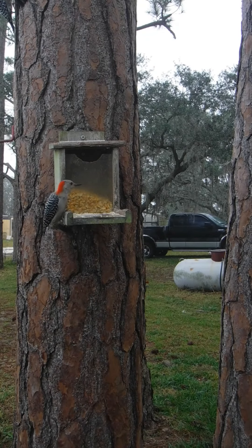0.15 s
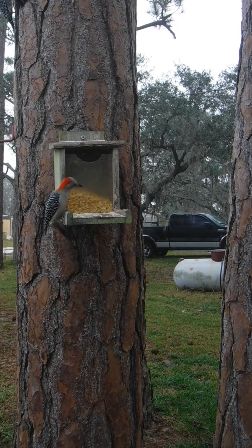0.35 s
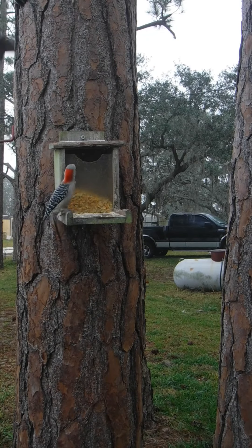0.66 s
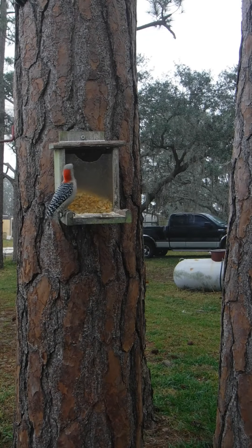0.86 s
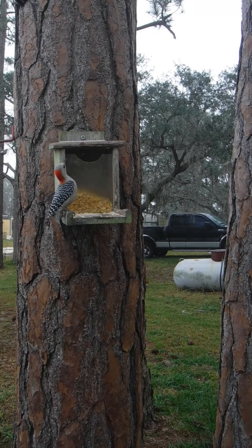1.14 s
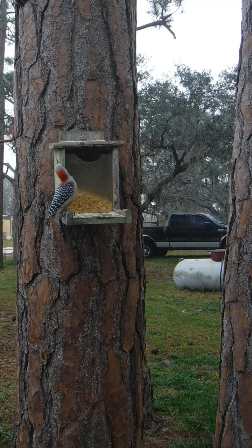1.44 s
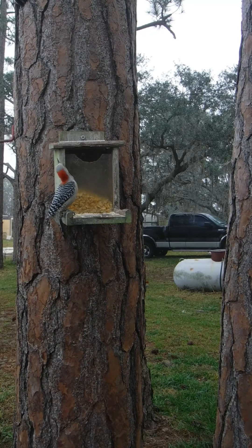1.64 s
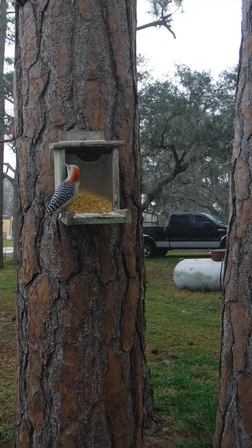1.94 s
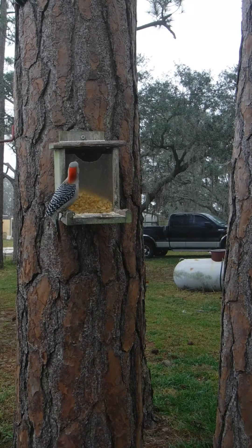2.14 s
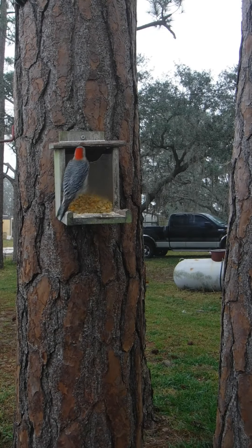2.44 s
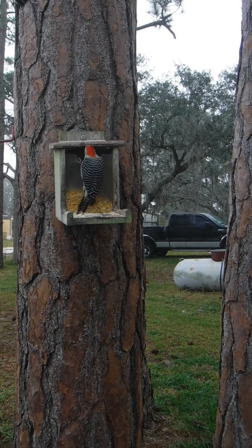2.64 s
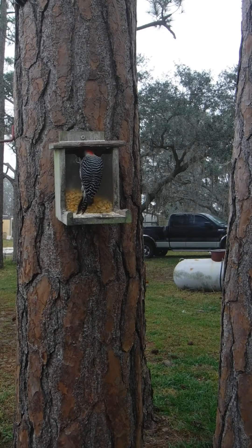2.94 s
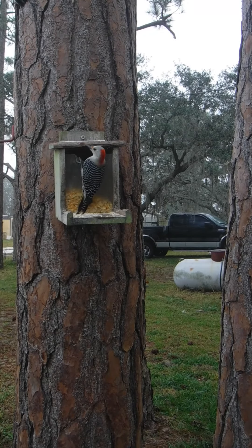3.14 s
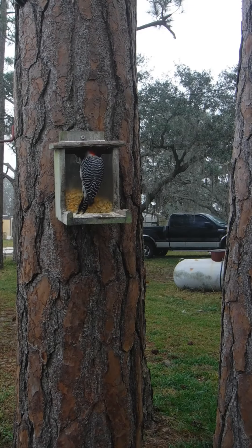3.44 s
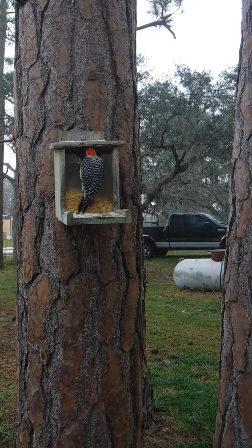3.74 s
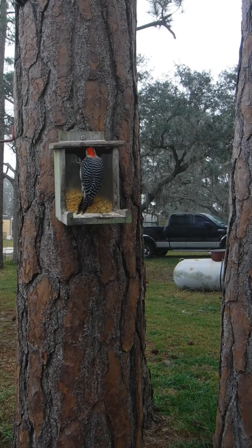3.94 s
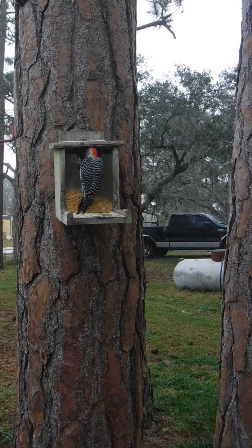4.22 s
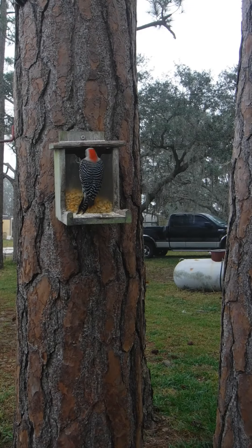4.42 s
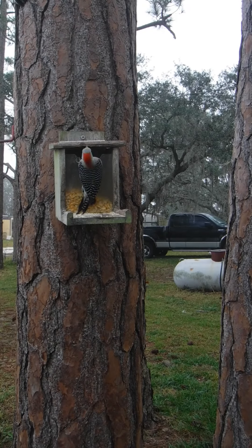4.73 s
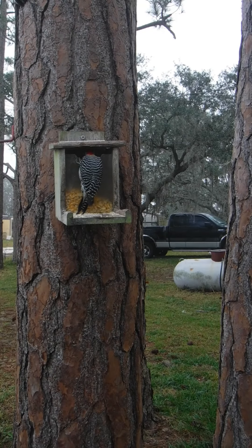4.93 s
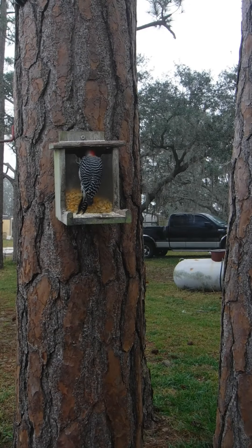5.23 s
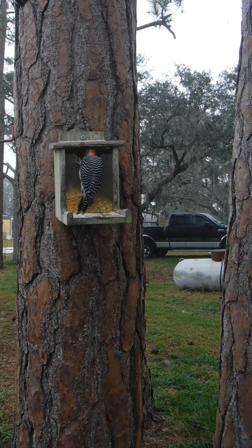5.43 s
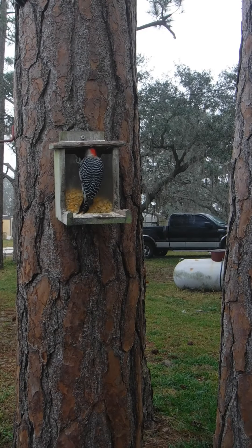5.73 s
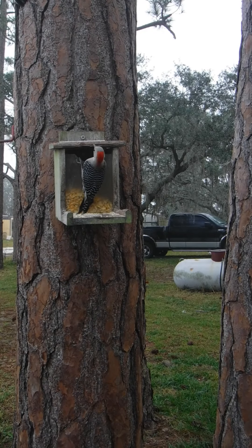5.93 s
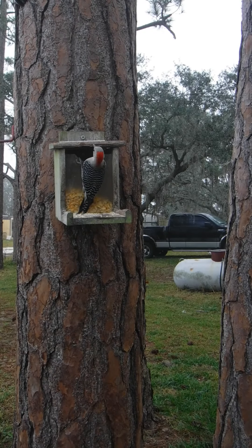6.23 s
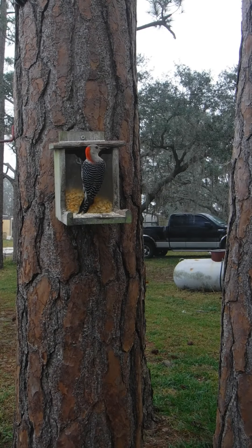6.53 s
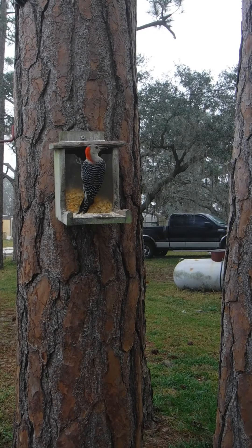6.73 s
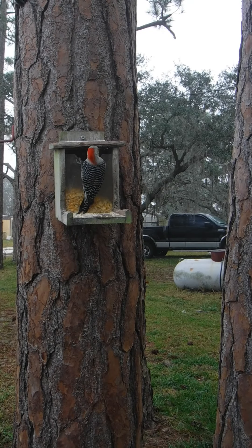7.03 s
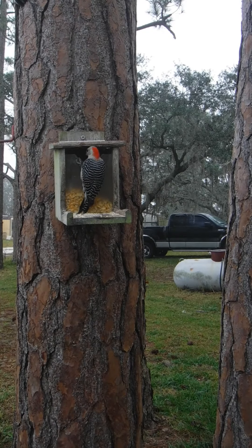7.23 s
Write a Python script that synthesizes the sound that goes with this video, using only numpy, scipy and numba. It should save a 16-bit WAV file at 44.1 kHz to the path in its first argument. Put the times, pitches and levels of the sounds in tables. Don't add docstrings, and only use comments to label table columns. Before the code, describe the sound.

Close to a wooden feeder among trees, a woodpecker barks two harsh calls, then after a pause three more, and late in the clip three louder ones. Each is a very short yelp breaking into a softer rasp. Claws and husks tick dryly on wood. Distant small birds whistle and chirp with slight echo. Low traffic rumble, a steady machine hum, faint hiss and a very high whine remain underneath.

```python
import sys
import numpy as np
from scipy import signal
from scipy.fft import rfft, irfft
from scipy.io import wavfile
from scipy.ndimage import uniform_filter1d
from numba import njit

SR = 44100
rng = np.random.default_rng(int(sys.argv[2]) if len(sys.argv) > 2 else 0)


def unload_wav(signal):
    wavfile.write(
        sys.argv[1],
        SR,
        np.round(np.clip(np.atleast_2d(signal).T, -1, 1) * 32767).astype(np.int16),
    )


def nominal_scale(level):
    x = np.asarray(level, float) / 20
    return 10 ** x


N = 325017
TIME = np.arange(N) / SR


def rms1(x):
    return x / np.sqrt(np.mean(x ** 2))


def steady(x, size=300):
    power = uniform_filter1d(uniform_filter1d(x ** 2, size), size)
    return x / np.sqrt(power + 1e-12)


@njit
def svf(x, hz, width):
    y, b, l = np.empty(len(x)), 0., 0.
    for i in range(len(x)):
        g, k = np.tan(np.pi * hz[i] / SR), width / hz[i]
        v = (b + g * (x[i] - l)) / (1 + g * (g + k))
        b, l, y[i] = 2 * v - b, l + 2 * g * v, k * v
    return y


def band(x, hz, width):
    return svf(x, np.clip(hz + np.zeros(len(x)), 10, SR / 2.2), float(width))


def steep(x, hz, width):
    return band(band(x, hz, width), hz, 1.5 * width)


def walk(rate, size=N):
    k = int(SR / rate)
    return rms1(uniform_filter1d(uniform_filter1d(rng.standard_normal(size), k), k))


def play(table, fade=.004):
    s, *columns = np.transpose(table)
    s = np.maximum.accumulate(s)
    span = slice(int((s[0] - fade) * SR), int((s[-1] + fade) * SR))
    t = TIME[span]
    ends = np.clip(np.minimum(t - t[0], t[-1] - t) / fade, 0, 1)
    return span, ends, [np.interp(t, s, c) for c in columns]


def yard():
    # pitch_hz, level_db (per Hz)
    yard_colour = [(12, -49), (20, -13), (59, -8), (85, -12.5), (108, -17.5), (135, -12), (171, -3),
                   (197, -9.5), (344, -6.5), (601, -14), (672, -13), (1650, -17.5), (2250, -24.5),
                   (12000, -31.5), (15700, -34)]
    # pitch_hz, level_db, width_hz
    hum_lines = [(171, -55.5, 2.3), (342.6, -65, 5.28), (118.7, -67.5, 1.36)]
    # pitch_hz, level_db
    whine_lines = [(13628.6, -81), (13688.8, -74.5), (13748.9, -80)]
    hz, db = np.transpose(yard_colour)
    f = np.maximum(np.arange(N // 2 + 1) * SR / N, 1)
    colour = nominal_scale(np.interp(np.log(f), np.log(hz), db))
    noise = rfft(rng.standard_normal(N)) * colour
    out, swell = np.zeros(N), walk(1.6)
    for octave in range(-1, 10):
        part = np.clip(1 - np.abs(np.log2(f / 31.25) - octave), 0, 1)
        wander_db = 0.5 * swell + 0.96 * walk(14)
        out += irfft(noise * part, N) * nominal_scale(wander_db)
    out = nominal_scale(-48) * rms1(out)
    for hz, db, width in hum_lines:
        turns = np.cumsum(hz + width * 0.457 * walk(23.7)) / SR
        out += nominal_scale(db + 0.5 * walk(36)) * np.sqrt(2) * np.sin(2 * np.pi * turns)
    for hz, db in whine_lines:
        out += nominal_scale(db) * np.sqrt(2) * np.sin(2 * np.pi * hz * TIME)
    return out


def far_birds():
    # start_s, length_s, from_hz, to_hz, level_db
    chirp_events = [(3.082, .02, 5900, 4400, -54), (3.118, 0.028, 3250, 4300, -57),
                    (3.164, 0.01637, 5300, 4500, -56), (3.198, .025, 3350, 4450, -56),
                    (3.244, 0.03087, 6281, 4850, -51), (3.388, .02, 5900, 4380, -55),
                    (5.02, 0.0996, 7200, 6916, -61), (5.78, 0.036, 4500, 4550, -58),
                    (4.325, 0.037, 8750, 8582, -54), (4.252, 0.15, 1340, 1390, -56.5),
                    (4.573, 0.127, 1396, 1300, -57), (4.95, 0.19, 1370, 1350, -59)]
    out = np.zeros(N)
    for s, length, from_hz, to_hz, db in chirp_events:
        size = int(length * SR)
        glide = np.geomspace(from_hz, to_hz, size)
        whistle = np.sin(2 * np.pi * np.cumsum(glide) / SR)
        out[int(s * SR):][:size] += nominal_scale(db) * np.hanning(size) ** .5 * whistle
    return out


def shaky_phase(hz, shake):
    return 2 * np.pi * np.cumsum(hz * (1 + shake * walk(359.5, size=len(hz)))) / SR


def songbird():
    # time_s, pitch_hz, level_db (of the strongest overtone)
    left_notes = [
        [(2.568, 3959, -61), (2.586, 3930, -47), (2.594, 3850, -52), (2.646, 3628, -53), (2.675, 3340, -48)],
        [(4.142, 3460, -49), (4.15, 3730, -41), (4.16, 3971, -41), (4.178, 3960, -46), (4.202, 3900, -44.5),
         (4.25, 3595, -47.5), (4.295, 3450, -50.5), (4.326, 3350, -59), (4.43, 3310, -73)],
        [(4.6, 4250, -57), (4.609, 3900, -48), (4.62, 3750, -50.5), (4.654, 3570, -54), (4.72, 3520, -66)],
    ]
    # time_s, pitch_hz, level_db (of the third overtone)
    right_notes = [
        [(2.566, 3080, -50), (2.58, 3020, -52), (2.61, 2980, -48), (2.64, 2880, -52), (2.675, 2837, -57)],
        [(4.144, 2830, -40), (4.154, 2950, -41.5), (4.2, 2980, -50), (4.23, 2860, -46), (4.258, 2800, -46),
         (4.29, 2740, -56), (4.32, 2600, -63), (4.352, 2741, -57), (4.366, 2540, -56)],
        [(4.594, 3290, -67.5), (4.61, 3090, -52), (4.625, 2871, -59), (4.645, 2760, -66), (4.67, 2690, -74)],
    ]
    # start_db, slope_db_per_s
    second_levels = [(-66, 95), (-59, -60), (-56, -220)]
    a, b = np.zeros((2, N))
    left, third, second = np.zeros((3, N))
    for table in left_notes:
        span, ends, (hz, db) = play(table, fade=0.0011)
        a[span] = shaky_phase(hz, 0.005)
        left[span] = ends * nominal_scale(db + 1.7 * walk(130, size=len(hz))) * np.sqrt(2)
    for table, (start_db, slope_db) in zip(right_notes, second_levels):
        span, ends, (hz, db) = play(table, fade=0.0011)
        b[span] = shaky_phase(hz, 0.0091)
        flutter_db = 1.7 * walk(130, size=len(hz))
        second_db = start_db + slope_db * TIME[:len(hz)]
        third[span] = ends * nominal_scale(db + flutter_db) * np.sqrt(2)
        second[span] = ends * nominal_scale(second_db + flutter_db) * np.sqrt(2)
    hoarse = 1 + .45 * walk(1500)
    left, third, second = left * hoarse, third * hoarse, second * hoarse
    out = left * (nominal_scale(-22) * np.sin(a) + np.sin(2 * a) + nominal_scale(-19) * np.sin(3 * a))
    out += third * np.sin(3 * b) + second * np.sin(2 * b)
    sum_tones = nominal_scale(-10.5) * np.sin(a + 2 * b) + nominal_scale(-37) * np.sin(a + b)
    return out + np.sqrt(np.abs(left * third)) * sum_tones


def claws():
    # start_s, peak_db, ring_hz, width_hz, t60_s
    tick_events = [(.042, -43, 9000, 5000, 0.017), (.25, -40.5, 9000, 6000, .008),
                   (0.372, -44, 3380, 900, .015), (.373, -46, 10000, 5000, .01),
                   (.413, -46, 9500, 3480, .08), (.417, -45, 3170, 700, .03),
                   (0.506, -54, 9500, 2500, 0.3324), (.645, -43, 10800, 2000, .008),
                   (.658, -54, 9300, 3000, 0.19), (.69, -48, 9200, 2000, .01),
                   (.732, -55.5, 9039, 4020, 0.15), (2.437, -33, 894.6, 450, 0.017),
                   (2.448, -36, 1200, 900, 0.012), (2.44, -43, 9534, 5000, .03),
                   (2.454, -30, 9000, 12000, 0.008), (2.4549, -36, 10500, 6000, 0.02718),
                   (2.465, -43, 7960, 4000, 0.079), (2.474, -40, 10000, 6000, .02),
                   (2.49, -47, 10000, 3000, .02), (2.4965, -41, 10500, 6000, 0.02),
                   (2.4985, -33.5, 9000, 9000, .014), (3.258, -39, 8000, 5000, .008),
                   (5.972, -36, 7500, 5000, 0.0091)]
    out, t = np.zeros(N), TIME[:SR // 8]
    for s, db, hz, width, t60 in tick_events:
        grit = band(rng.standard_normal(len(t)), hz, width)
        grit = rms1(band(grit, hz, 1.8 * width))
        attack = np.minimum(t / 0.00057, 1)
        out[int(s * SR):][:len(t)] += nominal_scale(db - 60 * t / t60) * attack * grit
    return out


def gesture(times, effort, voice, rasp, mouth, onset):
    (s, top_s, break_s, end_s), (top_db, late_db, rasp_db, fade_db) = times, effort
    (share_up, share, rising, pure), (rest_hz, open_hz, yelp_db, dull_db, soft_db) = voice, mouth
    wait_s, clear_s, clear, hoarse = rasp
    swollen_db, _, clearing_s = onset
    rise_s, crack_s, turn_s, release_s = .012, 0.010891, 0.0061, 0.015
    edge_rough, break_rough = 0.697, 0.58
    edge_bright_db, break_bright_db = -10.5, -11

    tired_s = max(end_s - release_s, break_s)
    inside = np.minimum(break_s + np.cumsum([wait_s, clear_s, turn_s, end_s]), tired_s)
    at = s + np.array([0, min(rise_s, top_s), top_s, break_s - crack_s, break_s, *inside, end_s])
    fading = rasp_db - fade_db * (inside - inside[0]) / (tired_s - inside[0] + 1e-9)
    db = [top_db - 28, top_db + swollen_db, top_db, late_db, rasp_db - 1, *fading, fading[-1] - 14.5]
    shares = [1, share_up, share, share] + [1] * 6
    rough = [edge_rough, rising, pure, pure + 0.14, break_rough, clear, clear, hoarse, hoarse, edge_rough]
    throat = rest_hz + (open_hz - rest_hz) * np.array([0, 0.075, 1, 0.4185] + [0] * 6)
    bright = [edge_bright_db, yelp_db, yelp_db, dull_db, break_bright_db] + [soft_db] * 4 + [edge_bright_db]
    rows = np.transpose([at, db, shares, rough, throat, bright])

    late = np.clip(1 - clearing_s / (at[2] - at[1] + 1e-9), 0, 1)
    clearing = rows[1] + late * (rows[2] - rows[1])
    clearing[2:4] = share_up, rising
    return np.insert(rows, 2, clearing, axis=0)


def syrinx(hz, share, rough, fast, skip, smear):
    size = len(hz)
    wobble = 1 + 0.0968 * rough * walk(370, size=size)
    phase = np.pi * np.cumsum(hz * wobble) / SR
    k = np.arange(1, 110)[:, None]
    beat_weight = np.where(k % 2 == 0, share, skip * rough * share)
    weight = np.where(k % (2 * fast) == 0, 1, beat_weight)
    lag = smear * (.6 * rng.standard_normal(k.shape) + .006 * k ** 2)
    audible = k * hz < 31000
    pulses = -steady(np.sum(weight * audible * np.cos(k * phase + lag), axis=0))
    air = rng.standard_normal(size) * (1 + 0.36 * np.cos(2 * phase))
    return pulses * nominal_scale(5.1 * rough * walk(200, size=size)), air


def lower_tract(voice, throat_hz, soft_db, sides, sac_db):
    windpipe, windpipe_db, beak, beak_db = sides
    low = steep(voice, throat_hz, 660)
    low -= nominal_scale(windpipe_db + 0.21 * soft_db) * steep(voice, windpipe * throat_hz, 890)
    low -= nominal_scale(beak_db + 0.21 * soft_db) * steep(voice, beak * throat_hz, 910)
    return low + nominal_scale(sac_db + 0.63 * soft_db) * steep(voice, 900, 450)


def upper_tract(hiss, effort_db, peaks, sag_hz):
    low_hz, low_db, mid_hz, mid_db, top_hz, top_db = peaks
    high = nominal_scale(low_db + effort_db) * steep(hiss, low_hz, 2060)
    high -= nominal_scale(mid_db) * steep(hiss, mid_hz + sag_hz * effort_db, 1900)
    high += nominal_scale(top_db + 2.1 * effort_db) * steep(hiss, top_hz, 1950)
    return high + nominal_scale(-14.5) * steep(hiss, 11000, 8100)


def woodpecker():
    # top_s, break_s, end_s
    call_times = [(.249, 0.027, 0.046, 0.13), (.537, 0.024, 0.051, 0.078), (2.662, 0.023, 0.047, 0.13),
                  (2.944, 0.024, 0.054, .13), (3.259, 0.027, 0.051, 0.15), (5.631, 0.025, 0.054, 0.12),
                  (5.975, 0.024, 0.0488, 0.14), (6.308, 0.025, 0.049, 0.15)]
    # top_db, late_yelp_db, rasp_db, rasp_fade_db
    call_effort = [(-21, -20.5, -36, 4), (-16, -22.5, -30.5, 9.5), (-22, -28.5, -33, 3),
                   (-20, -25.5, -34, 1.5), (-18, -23.5, -31, 6.5), (-16.5, -17, -26.5, 2.5),
                   (-14, -15.5, -28.5, 1), (-14, -15, -30, 5)]
    call_voice = [(.6, 0.9, 0.58, 0.05), (.99, 0.9, 0.25, 0.23), (0.3, 0.42, 0.58, 0.3),
                  (0.3, 0.12, 0.63, .3), (0.4, 0.05, 0.6, 0.39), (0.12, 0.09, 0.22, 0),
                  (0.23, 0.08, 0.39, 0.04), (0.48, 0.15, 0, 0.13)]
    # clears_after_s, stays_clear_s, rough_clear (0-1), rough_after (0-1)
    call_rasp = [(.02, .02, 0.46, 0.5), (0.0027, .003, 0.6, .3), (0.016, 0.0254, 0.08, 0.44),
                 (.026, 0.038, 0.14, 0), (0.0052, 0.016, 0.18, 0.38), (.02, 0.022, 0.64, 0.62),
                 (0.024435, 0.038, 0.05, 0.4), (0.039, 0.03, 0.44, 0.52)]
    # rest_hz, top_hz, rising_db, late_yelp_db, rasp_db
    call_mouth = [(2010, 2770, -3.5, -16, -17), (2192.1, 2680, -8.5, -9.5, -5), (1900, 2440, -9, -10, -16),
                  (1750, 1940, -5, -9, -10.5), (1940, 1990, -2.5, -14, -12.5), (1940, 2730, 0, -12, -10),
                  (2320, 2455, -8.5, -21, -19.5), (2410, 2920, -3.5, -16, -15.5)]
    # swollen_db (under the top), skipped_beats (strength), clears_before_top_s
    call_onset = [(-6, .27, 0.0116), (-6.5, .27, .012), (-5.5, 0.68, .01), (-5.5, .27, 0.0083),
                  (-7, 0.95, 0.011), (-5.5, 0.348, 0.011), (-4, 0.25, .009), (-7.5, 0.58, .005)]
    # time_s, beat_hz
    beat_tables = [
        [(.249, 398), (.262, 454.5), (.275, 502), (.287, 394), (.366, 404)],
        [(.537, 392.4), (.546, 421), (.56, 512.3), (.567, 520.5), (.576, 441), (.598, 401)],
        [(2.681, 502), (2.69, 472), (2.703, 400), (2.734, 531), (2.77, 509), (2.79, 488)],
        [(2.957, 597), (2.968, 590.5), (2.986, 511), (2.996, 500), (3.014, 564), (3.026, 580), (3.062, 545)],
        [(3.259, 477.6), (3.27, 562), (3.283, 621), (3.3, 528), (3.312, 453.9), (3.337, 512), (3.395, 497)],
        [(5.638, 556), (5.648, 508.4), (5.659, 502), (5.668, 470.4), (5.676, 447), (5.684, 386.3), (5.705, 478),
         (5.757, 432)],
        [(5.975, 384.6), (5.988, 336), (5.995, 328.7), (6.004, 330.2), (6.011, 316.5), (6.019, 273.8),
         (6.05, 337), (6.075, 331), (6.117, 269)],
        [(6.307, 424), (6.32, 458), (6.3305, 556.3), (6.3335, 487.6), (6.348, 443.5), (6.357, 363.5),
         (6.4, 422), (6.459, 384.5)],
    ]
    fast_pulses = [2, 2, 3, 3, 3, 3, 4, 3]
    flap_smear = [(.6, 1), (.5, .7), (1.1, .7), (.6, .8), (.5, 1), (.3, 1.1), (.25, 1.15), (.15, 1.1)]
    # windpipe_share, windpipe_db, beak_share, beak_db
    lower_peaks = [(0.378, -23, 1.56, -24), (.38, -19, 1.31, -11), (.5, -13.5, 1.49, -10.5),
                   (.6, -7.5, 1.47, -5), (.45, -14.5, 1.57, -13), (.47, -18.5, 1.44, -13),
                   (.62, -13.5, 1.48, -13.5), (.64, -6, 1.38, -8.5)]
    # low_hz, low_db, mid_hz, mid_db, top_hz, top_db
    upper_peaks = [(5100, 11, 9000, 4, 12350, 9.5), (5300, 2, 8360, 1, 11400, -6),
                   (4500, 7, 8600, 10, 12328, 9), (5000, -3, 6900, -2.5, 14000, -8),
                   (5000, 2.5, 7900, -4, 11449, -5), (4550, 7, 8900, -5.5, 11250, -4.5),
                   (5000, 8.5, 8300, 6.5, 12340, 5.5), (5550, 5, 8840, 3.5, 11600, -9)]
    # sac_db, sag_hz_per_db
    sac_settings = [(-9.5, 4), (-9.5, 5), (-39.5, 22), (-30, -71.5), (-28, -44), (-8, 140.5), (-11.5, -3.5),
                    (-9, 121)]
    # yelp_hz, rasp_hz, width_hz, share (0-1)
    throat_pocket = [(4120, 3950, 557.7, 0.8), (4250, 4600, 600, .95), (5500, 5600, 530, 0.4),
                     (4140, 4800, 420, 0.59), (4000, 4500, 560, 0.5), (5800, 5300, 1700, 0.78),
                     (6340, 4100, 640.4, 0.5), (4800, 4900, 890, 0.73)]

    out = np.zeros(N)
    calls = map(gesture, call_times, call_effort, call_voice, call_rasp, call_mouth, call_onset)
    for table, beat, fast, onset, loose, sides, peaks, (sac_db, sag_hz), pocket in zip(
            calls, beat_tables, fast_pulses, call_onset, flap_smear,
            lower_peaks, upper_peaks, sac_settings, throat_pocket):
        span, ends, (db, share, rough, throat_hz, bright_db) = play(table)
        t, yelp_to_rasp = TIME[span], table[4:6, 0]
        hz = np.interp(t, *np.transpose(beat))
        smear = np.interp(t, yelp_to_rasp, loose)
        pulses, air = syrinx(hz, share, rough, fast, onset[1], smear)

        soft_db = np.clip(db.max() - db, 0, 20) - 8.5
        low = lower_tract(pulses + 1.7 * rough * air, throat_hz, soft_db, sides, sac_db)
        hiss = pulses + (0.28 + 3 * rough) * air
        high = upper_tract(hiss, .8 * (db - db.max()), peaks, sag_hz)
        call = steady(low) + nominal_scale(bright_db) * steady(high)

        yelp_hz, rasp_hz, width, swallowed = pocket
        pocket_hz = np.interp(t, yelp_to_rasp, [yelp_hz, rasp_hz])
        out[span] += ends * nominal_scale(db) * (call - swallowed * band(call, pocket_hz, width))
    return out


def trunks(x, t60, wet_db):
    t = TIME[:SR // 2]
    tail = band(rng.standard_normal(len(t)), 3500, 6600)
    tail *= nominal_scale(-60 * t / t60) * np.minimum(t / 0.015, 1)
    return x + nominal_scale(wet_db) * signal.fftconvolve(x, tail / np.sqrt(np.sum(tail ** 2)))[:N]


def scene():
    near = trunks(woodpecker() + claws(), t60=0.49, wet_db=-32)
    far = trunks(songbird() + far_birds(), t60=.45, wet_db=-14)
    return (near + far + yard())[None]


def starve(x):
    starved_frames = [0, 16, 21, 27, 40, 57, 69, 83, 91, 95, 101, 134, 171, 184, 190, 222, 236, 251, 275,
                      278, 310, 318, 327]
    frame_s, first_s = 1024 / 48000, .141
    keep_db, edge_hz = -16, 2300
    out, size = x.copy(), int(2 * frame_s * SR)
    window = np.sin(np.pi * np.arange(size) / size) ** 2.7
    f = np.arange(size // 2 + 1) * SR / size
    for frame in starved_frames:
        start = int((first_s + (frame - 1) * frame_s) * SR)
        bins = rfft(x[start:start + size] * window)
        strength = uniform_filter1d(np.abs(bins), size=5)
        luck = rng.random(80)
        lucky = luck[np.minimum(f // 220, 79).astype(int)] < .22
        weak = strength < nominal_scale(keep_db) * strength.max()
        no_peak = strength < 2.6 * uniform_filter1d(strength, size=61)
        lost = (f > edge_hz) & weak & no_peak & ~lucky
        out[start:start + size] -= window * irfft(bins * lost, size)
    return out


def band_limit(x):
    return signal.sosfilt(signal.butter(12, 15840, fs=SR, output="sos"), x)


def record(dry):
    top_cut = signal.ellip(10, .1, 70, 15800, fs=SR, output="sos")
    mix = signal.sosfilt(top_cut, starve(dry[0]))[None]
    return band_limit(mix)


dry = scene()
out = record(dry)
unload_wav(out)
```